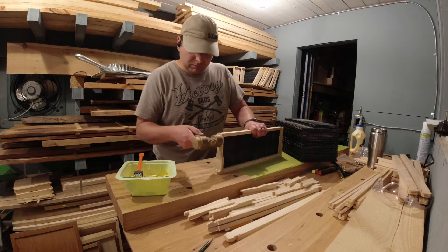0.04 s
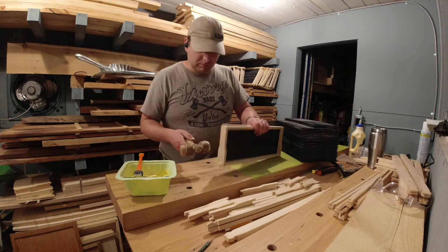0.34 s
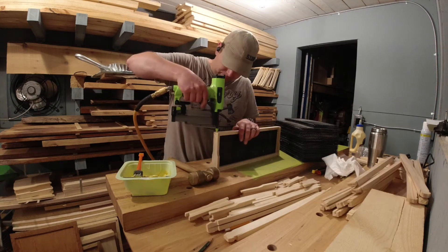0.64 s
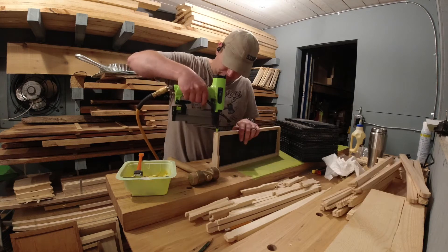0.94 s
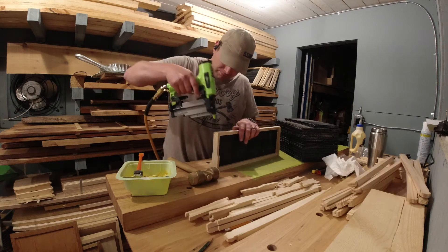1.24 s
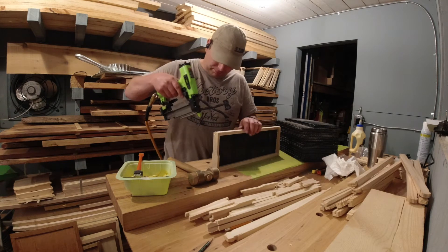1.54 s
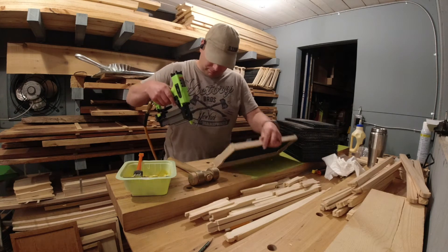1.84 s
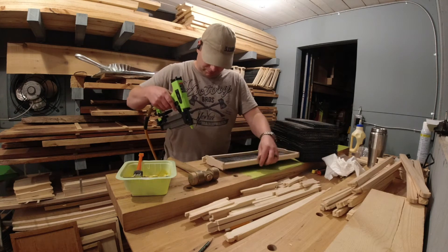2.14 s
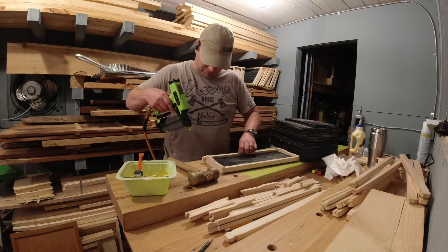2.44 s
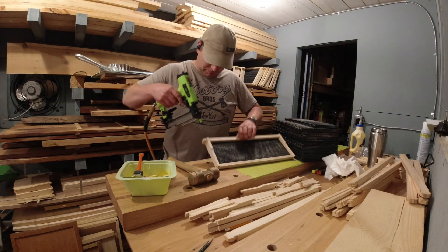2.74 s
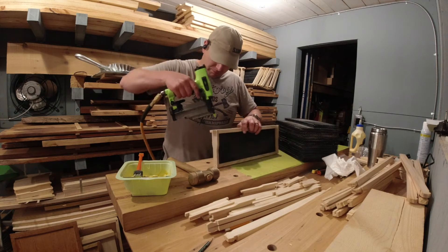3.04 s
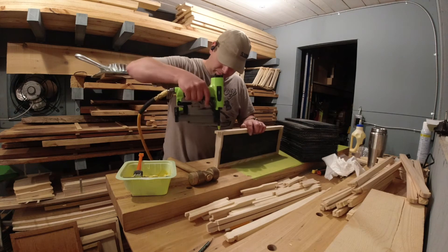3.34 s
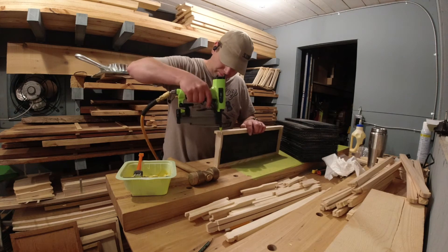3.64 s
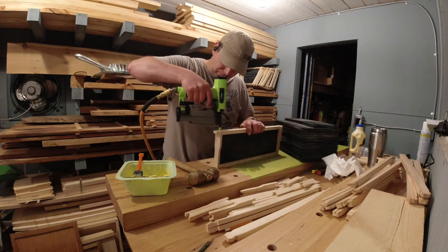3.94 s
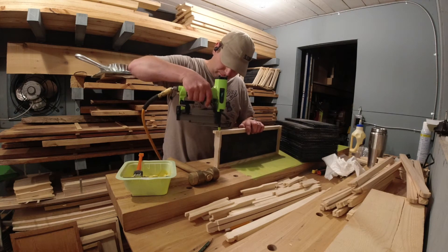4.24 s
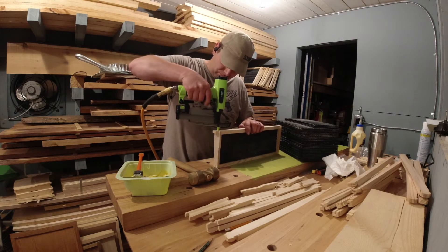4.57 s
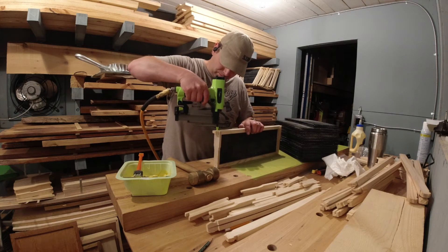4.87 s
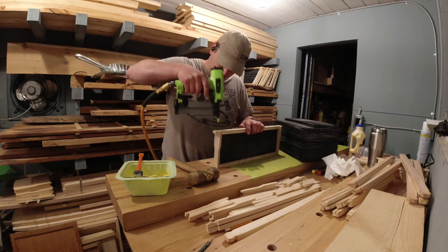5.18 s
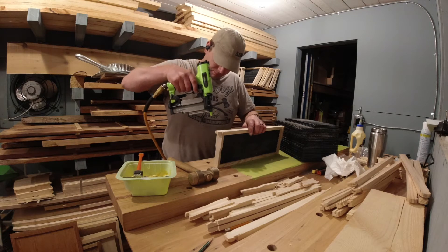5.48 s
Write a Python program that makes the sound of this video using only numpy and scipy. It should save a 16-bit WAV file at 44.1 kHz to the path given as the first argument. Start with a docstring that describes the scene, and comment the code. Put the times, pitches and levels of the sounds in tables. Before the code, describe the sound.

An air nailer fires three sharp shots in a small workshop, with a wooden frame clattering and knocking on the bench after the first.

```python
"""Nailing a wooden frame

On a workbench in a small timber-lined shop an air nailer fires three times: a puff at the valve, the
piston's blow, then exhaust and recoil. After the first nail the frame is slid over, dropped flat,
stood up again and pressed into place. Impacts excite the damped modes of nailer, frame and bench;
escaping air and sliding friction give broadband noise. The room carries it all to two microphones."""
import sys
import numpy as np
from scipy import signal
from scipy.fft import rfft, irfft, next_fast_len
from scipy.io import wavfile

SR = 44100
rng = np.random.default_rng(int(sys.argv[2]) if len(sys.argv) > 2 else 0)


def master_out(mix):
    """Clip the mix to full scale and print it as 16-bit PCM to the path in sys.argv[1]."""
    frames = np.transpose(np.atleast_2d(mix))
    ceiling = np.clip(frames, -1, 1)
    pcm = np.round(ceiling * 32767).astype(np.int16)
    wavfile.write(sys.argv[1], SR, pcm)


N = 251811
TIME = np.arange(N) / SR
TAIL = TIME[:26460]  # the first 0.6 s

# Levels are relative: each source applies its own gain. A cutoff is the brightness of a contact.
# nailer shots: (time [s], blow level [dB], valve lead [s], valve level [dB], exhaust lag [s],
# exhaust level [dB], piston return lag [s])
SHOTS = [(0.9536, 7, 0.037, -28, 0.019, -35.5, .11), (4.48, 7.5, 0.027, -32, 0.087, -33.5, 0.15),
         (4.9216, 6.5, .0235, -31.5, 0.067, -34, 0.12)]
# the nailer drops back on the joint: (time [s], first gap [s], landing level [dB], rebound level [dB])
RECOILS = [(1.011, 0.021, -4.5, -4), (4.579, 0.014, -5, -2), (4.998, .019, -1.5, -10.5)]
# hand and tool knock and scrape the frame: (time [s], level [dB], cutoff [Hz], scrape t60 [s])
KNOCKS = [(.002, -1.5, 626, 0.0056), (.003, -10, 4850, 0.082), (.25, -38, 890, 0.075),
          (.883, -32, 3683, .11), (1.985, -16, 505, .04), (2.543, -12, 550, .043), (2.594, -19, 980, 0.069),
          (2.636, -25, 2010, 0.042), (2.761, -27.5, 5900, .16), (2.839, -7, 500, .013),
          (2.956, -2, 1440, 0.046), (2.958, -8.5, 5100, 0.11), (3.204, -33, 700, .12),
          (3.472, -12, 320, .03), (3.495, -6, 260, .04), (3.685, -11, 240, 0.027), (5.67, -34, 905.5, 0.13)]
# the frame falls flat and bounces twice: (time [s], level [dB], cutoff [Hz], loss per corner [dB])
LANDINGS = [(2.2416, 3, 3330, 1), (2.312, 4.5, 1870, 3.1), (2.400, -10, 2420, 2.5)]
# the frame thumps the bench as it is stood up and pressed home: (time [s], level [dB], cutoff [Hz])
THUMPS = [(.003, -12, 203), (2.86, -10.5, 98), (2.955, -6, 631), (2.989, 3.5, 40), (3.04, -4, 41),
          (3.474, 0, 124.5), (3.517, 2.5, 75), (3.689, -16.5, 97), (3.82, -12.5, 49.65)]
# hands slide and turn the frame: (time [s], duration [s], level [dB], level change [dB])
SLIDES = [(.04, 0.04, -48.5, -18), (.36, 0.78, -73, -9), (1.47, 0.084, -71, -0.5), (1.6, 0.29, -69, -12),
          (1.83, 0.25, -53, -3), (2.05, 0.22, -63, 7.5), (2.5, 0.21, -53.5, -12), (2.66, 0.238, -70, 14),
          (3.06, 0.18, -62, 2), (3.33, .14, -68, -5.5), (3.48, .24, -66, -3.5), (3.72, 0.3, -77, -3.5),
          (4.22, 0.26, -84, 1.5), (5.48, .22, -88, 2)]
# weight is put on the bench: (time [s], duration [s], level [dB], level change [dB])
LEANS = [(0, 0.7, -70.5, 1), (1.05, 0.75, -55.5, -19), (2.0, 0.78, -70.5, 8), (2.8, 1.206, -54.5, -12.5),
         (5.0, 0.63, -59, -20)]

# normal modes of each body: (frequency [Hz], energy [dB], t60 [s])
NAILER_MODES = [(282, -18, 0.19), (370, -13.5, .06), (517, -8, .07), (609.9, -16.5, .06),
                (804, -19.5, 0.019), (883, -13, 0.049), (1042, -10.5, 0.093), (1200, -5, .08),
                (1390, -4.5, 0.058), (1686, -10.5, 0.068), (1600, -15, 0.26), (1885, -0.5, 0.057),
                (2120, -2, .06), (2235, -6.5, 0.057), (2410, -10.5, .06), (2930, -6, 0.17),
                (3210, -7.5, 0.18), (3445, -11, 0.21), (3930, -9, 0.031), (4030, -5.5, 0.02),
                (4020, -16.5, .07), (4590, -14, 0.045)]
TRIGGER_MODES = [(2400, -5.5, .003), (4240, -1, .009), (9500, -7, .002), (12700, -5, .002)]
FRAME_MODES = [(228, -12.5, .07), (303, -8.5, 0.064), (393, -10, 0.4), (499.4, -6, 0.17), (609, -4.5, 0.1),
               (712, -5.5, 0.077), (777, -4.5, 0.075), (896, -6, .05), (1082, -4, 0.17),
               (1217, -6.5, 0.066), (1314, -2, .05), (1510, -8, 0.12), (1882, -11, 0.014), (2260, -5, .025),
               (2680, -9.5, .02), (3120, -11, .015), (3330, -4.5, .015)]
BENCH_MODES = [(42, -5, .4), (60, -3, 0.67), (92, -6.5, 0.34), (128, -6.5, 0.047), (152, -6, .12),
               (206, 3, 0.052), (309, -0.5, 0.033)]
RUB_MODES = [(330, -5, .03), (435, -0.5, 0.1), (652.4, -5, 0.011), (794, -2, .03), (1044, -15, .04),
             (2110, -18, 0.053), (2870, -17, 0.018), (3710, -15, 0.027), (4720, -22.5, 0.026)]

# spectral envelope of each noise or transient: (frequency [Hz], level [dB])
CASING_CRACK = [(100, -9), (400, -2), (1000, -1), (1900, 3), (2600, -5.5), (3800, 3.5), (5200, -5.5),
                (6400, -9.5), (7500, -20), (8600, -6.5), (11000, -5), (15500, -5)]
AIR_JET = [(100, -13), (400, -8.5), (850, -11), (1400, -6.5), (2500, -7), (3800, -3), (5500, -12),
           (7200, -19), (8500, -7), (10000, -4), (13000, -0.5), (16000, -9)]
WOOD_TICK = [(150, -8.5), (700, -5), (2000, 1), (3700, 0), (5500, -8), (7200, -11.5), (9800, 1),
             (13000, -5.5), (16000, -13.5)]
WOOD_RUB = [(100, -25.5), (200, -8.5), (320, 5), (520, -5.5), (750, -13), (1000, -10.5), (1600, -11.5),
            (2500, -19.5), (3600, -17.5), (5000, -26), (7000, -45.5), (9700, -35.5), (15000, -60.5)]
BENCH_THUD = [(12, 0.5), (30, -3.5), (70, -1.5), (130, -4), (300, -9.5), (700, -18), (3000, -42.5)]
BENCH_RUMBLE = [(15, -8), (35, -0.5), (50, -4), (68, 2.5), (90, -9), (130, -19), (200, -25), (400, -43),
                (2000, -89.5)]
ROOM_TONE = [(59, -25.5), (100, -20.5), (193, -10), (721, -18.5), (930, -21.5), (1680, -17.5),
             (2040, -22.5), (4770, -24), (7610, -38), (16000, -43)]

# reverberation time of the shop: (frequency [Hz], t60 [s])
SHOP_T60 = [(100, .38), (300, .33), (1000, .32), (3000, .29), (8000, .255), (15000, .245)]


def nailer(stroke_s=.0035, ring_db=1, crack_db=3.98, contact_db=-7.5, first_crack_db=-4.5):
    """Double impact: the driver meets the nail, then the piston slams home and the casing rattles."""
    blows, cracks, tone = np.zeros(N), np.zeros((2, N)), colour(CASING_CRACK)
    for s, blow_db, *_ in SHOTS:
        ring = from_db(blow_db + ring_db) * ringing(NAILER_MODES, length_s=.2, detune=.0075)
        add(blows, s, from_db(contact_db) * ring)
        add(blows, s + stroke_s, ring)
        crack_gain = from_db(blow_db + crack_db)
        add(cracks, s, crack_gain * from_db(contact_db + first_crack_db) * chatter(tone, t60=.019))
        add(cracks, s + stroke_s, crack_gain * chatter(tone, t60=.069))
    return (through(blows, shop(near_db=-3, near_t60=.017, tail_db=-8, lead_s=.00006))
            + through(cracks, shop(near_db=-9.5, near_t60=.12, tail_db=-7)))


def air_jets(jet_db=3, opening_s=.014, valve_hold_s=.012, shut_early_s=.012):
    """Turbulent jet noise: valve and exhaust each open quickly, hold, and die as the pressure falls."""
    flow, opening = np.zeros(N), 1 - fade(TAIL, opening_s)
    for s, _, valve_lead, valve_db, exhaust_lag, exhaust_db, return_lag in SHOTS:
        add(flow, s - valve_lead, from_db(valve_db) * opening * fade(TAIL - valve_hold_s, t60=.076))
        hold_s = return_lag - exhaust_lag - shut_early_s  # until just before the piston is back
        add(flow, s + exhaust_lag, from_db(exhaust_db) * opening * fade(TAIL - hold_s, t60=.09))
    jet = through(from_db(jet_db) * flow * hiss(), colour(AIR_JET))
    return through(jet, shop(near_db=2, near_t60=.099, tail_db=-8))


def recoil_bounces(gap_ratio=.89, loss_db=9):
    """Inelastic rebound: the nailer lands, bounces, then touches again, sooner and softer."""
    for s, gap, landing_db, rebound_db in RECOILS:
        yield s, landing_db
        yield s + gap, rebound_db
        yield s + gap * (1 + gap_ratio), rebound_db - loss_db


def frame(ring_db=-1, damping_s=.2):
    """Impact excitation: each contact rings the frame under a woody scrape; long scrapes damp it."""
    dry, tone = np.zeros((2, N)), colour(WOOD_TICK)
    for s, db, hz, scrape_t60 in frame_contacts():
        ring = ringing(FRAME_MODES, length_s=.12, uneven_db=4.5, detune=.025)
        ring /= 1 + (scrape_t60 / damping_s) ** 2
        add(dry, s, from_db(db + ring_db) * soften(ring, hz))
        add(dry, s, from_db(db) * soften(chatter(tone, scrape_t60), hz))
    return through(dry, shop(near_db=-6, near_t60=.18, tail_db=-9, lead_s=-.000025))


def frame_contacts(recoil_db=-5.5, recoil_hz=734, return_db=-12.5, return_hz=5500, scrape_t60=.016):
    """Impulsive forces on the frame: (time [s], level [dB], cutoff [Hz], scrape t60 [s])."""
    recoils = [(s, db + recoil_db, recoil_hz, scrape_t60) for s, db in recoil_bounces()]
    piston_returns = [(s + lag, return_db, return_hz, scrape_t60) for s, *_, lag in SHOTS]
    return list(KNOCKS) + list(corner_clatter()) + recoils + piston_returns


def corner_clatter(first_gap_s=.0065, gap_growth=1.4, scrape_t60=.038):
    """Successive impacts: the four corners of the falling frame land in turn, at widening gaps."""
    for s, db, hz, loss_db in LANDINGS:
        for corner in range(4):
            yield s, db - corner * loss_db, hz, scrape_t60
            s += first_gap_s * gap_growth ** corner


def bench(strike_db=-2):
    """Low-frequency resonance: the heavy top answers each contact with a thud and a modal boom."""
    dry, boom, thud = np.zeros(N), ringing(BENCH_MODES, length_s=.94), colour(BENCH_THUD)
    for s, db, hz in bench_contacts():
        add(dry, s, from_db(db + strike_db) * soften(boom, hz))
        add(dry, s, from_db(db + strike_db) * soften(thud, hz))
    return through(dry, shop(near_db=-9.5, near_t60=.06, tail_db=-11, lead_s=.00008))


def bench_contacts(recoil_hz=330, drop_db=-25, drop_hz=450, valve_db=-22, jolt_db=-21, jolt_hz=395):
    """Structure-borne impulses that reach the bench top: (time [s], level [dB], cutoff [Hz])."""
    contacts = list(THUMPS) + [(s, db, recoil_hz) for s, db in recoil_bounces()]
    contacts += [(s, db + drop_db, drop_hz) for s, db, *_ in LANDINGS]
    for s, blow_db, valve_lead, *_ in SHOTS:
        contacts += [(s - valve_lead, valve_db, jolt_hz), (s, blow_db + jolt_db, jolt_hz)]
    return contacts


def sliding(rub_db=-1, slips_per_s=32, slip_db=3, catches_per_s=22, catch_db=22, catch_spread_db=2.5):
    """Stick-slip friction: wood rubs unevenly and ticks where an edge catches on the grain."""
    effort = swells(SLIDES)
    slips = np.interp(TIME * slips_per_s, np.arange(N), rng.standard_normal(N))
    friction = hiss() * effort * from_db(rub_db + slip_db * slips)
    wood = colour(WOOD_RUB)
    add(wood, 0, ringing(RUB_MODES, length_s=.1))
    caught = rng.random(N) < catches_per_s / SR
    catches = caught * effort * from_db(catch_db + catch_spread_db * rng.standard_normal(N))
    tick = soften(chatter(colour(WOOD_TICK), t60=.077), hz=3000)
    dry = through(friction, wood) + through(catches, tick)
    return through(dry, shop(near_db=-5, near_t60=.017, tail_db=-10))


def trigger(ahead_s=.023, click_db=-34):
    """Contact noise: the trigger's small steel parts click and grate just before the valve opens."""
    dry, steel = np.zeros((2, N)), ringing(TRIGGER_MODES, length_s=.15)
    for s, _, valve_lead, *_ in SHOTS:
        add(dry, s - valve_lead - ahead_s, from_db(click_db) * chatter(steel, t60=.14))
    return through(dry, shop(near_db=-1.5, near_t60=.05, tail_db=-8.5))


def bench_rumble(still_db=-72.5):
    """Amplitude-modulated noise: a faint rumble swells as weight shifts on the bench."""
    return ambient(BENCH_RUMBLE) * (swells(LEANS) + from_db(still_db))


def shop(near_db, near_t60, tail_db, lead_s=0):
    """Room impulse response: direct sound (left leads by lead_s), near scatter and reverberation."""
    size = len(TAIL)
    hz = np.fft.rfftfreq(size, 1 / SR)
    direct = np.array([np.sinc((TAIL - lag) * SR - 8) for lag in (0, lead_s)])
    near = unit(diffuse(size) * fade(TAIL, near_t60) * (1 - fade(TAIL, .002)))
    field, centres = rfft(diffuse(size)), np.array(SHOP_T60)[:, 0]
    tail = np.zeros((2, size))
    for share, (_, t60) in zip(np.eye(len(centres)), SHOP_T60):
        band = irfft(field * at_hz(np.c_[centres, share], hz), size)
        tail += band * fade(TAIL, t60)
    tail *= 1 - fade(TAIL, .04)
    return unit(direct + from_db(near_db) * near) + from_db(tail_db) * unit(tail)


def ambient(spectrum):
    """Stationary noise: a diffuse field filtered to a given spectrum."""
    return through(hiss(), colour(spectrum))


def ringing(modes, length_s, uneven_db=0, detune=0):
    """Modal superposition: the striking spot varies each mode's strength, the grip its pitch."""
    hz, db, t60 = np.transpose(modes)[:, :, None]
    strength, pitch = rng.standard_normal((2, len(modes), 1))
    t, signs = TIME[:int(length_s * SR)], (-1) ** np.arange(len(modes))[:, None]
    amplitudes = signs * from_db(db + uneven_db * strength) / np.sqrt(t60)
    partials = np.sin(2 * np.pi * hz * (1 + detune * pitch) * t)
    return unit(np.sum(amplitudes * partials * fade(t, t60), axis=0))


def chatter(tone, t60):
    """Scattering: tiny contacts, spread by the timber, merge into a burst that swells and dies."""
    t = TIME[:len(tone)]
    burst = diffuse(len(t)) * fade(t, t60) * (1 - fade(t, t60 / 2))
    return unit(through(burst, tone)[:, :len(t)])


def soften(sound, hz):
    """Contact compliance as a low-pass: a softer contact pushes for longer and sounds duller."""
    return signal.sosfilt(signal.butter(2, min(hz, SR / 3), fs=SR, output="sos"), sound)


def swells(movements, attack_share=.09, release_t60=.056):
    """Amplitude envelope: each movement builds up, drifts in strength, and dies away."""
    level = np.zeros(N)
    for s, length, db, change_db in movements:
        progress = np.clip((TIME - s) / length, 0, 1)
        attack = np.minimum(progress / attack_share, 1)
        level += from_db(db + change_db * progress) * attack * fade(TIME - s - length, release_t60)
    return level


def diffuse(size, spacing_m=.048, sound_m_per_s=343):
    """Diffuse-field coherence: noise at two close microphones is alike in the bass, not the treble."""
    hz = np.fft.rfftfreq(size, 1 / SR)
    coherence = .994 * np.sinc(2 * hz * spacing_m / sound_m_per_s)
    mid, side = np.exp(2j * np.pi * rng.random((2, len(hz)))) * np.sqrt(size / 2)
    return irfft(np.sqrt(1 + coherence) * mid + np.sqrt(1 - coherence) * side * [[1], [-1]], size)


def hiss():
    """Diffuse white noise as long as the scene."""
    return diffuse(2 * next_fast_len(N // 2 + 1, True))[:, :N]


def colour(spectrum, size=8192):
    """Minimum-phase impulse response of a spectrum, with unit energy."""
    magnitude = from_db(at_hz(spectrum, np.fft.rfftfreq(size, 1 / SR)))
    cepstrum = irfft(np.log(magnitude))
    cepstrum[size // 2:] = 0
    return unit(irfft(np.exp(2 * rfft(cepstrum))))


def through(x, response):
    """Convolution with an impulse response."""
    return signal.fftconvolve(np.atleast_2d(x), np.atleast_2d(response), axes=-1)[:, :N]


def add(track, s, sound):
    """Superposition of a sound on a track, starting at s seconds."""
    size = track.shape[-1]
    start = int(np.clip(round(s * SR), 0, size - 1))
    track[..., start:start + sound.shape[-1]] += sound[..., :size - start]


def at_hz(points, hz):
    """Interpolation on a log-frequency axis."""
    knots, values = np.transpose(points)
    return np.interp(np.log(hz + 1), np.log(knots), values)


def fade(t, t60):
    """Exponential decay: one until t = 0, then falling 60 dB every t60."""
    return np.exp(-np.log(1000) * np.clip(t / t60, 0, 10))


def unit(x):
    """Normalisation to a mean energy of one per channel."""
    return x / np.sqrt(np.mean(np.sum(x ** 2, axis=-1)))


def from_db(db):
    """Amplitude ratio of a level in decibels."""
    return 10 ** (np.asarray(db) / 20)


def scene(room_tone_db=-86):
    """Linear superposition: the work at the bench adds to the quiet of the shop."""
    work = nailer() + air_jets() + frame() + bench() + sliding() + bench_rumble() + trigger()
    return work + from_db(room_tone_db) * ambient(ROOM_TONE)


def record(dry, cutoff_hz=16100):
    """Band limiting: a steep elliptic low-pass removes the highest treble."""
    return signal.sosfilt(signal.ellip(10, .1, 80, cutoff_hz, fs=SR, output="sos"), dry)


dry = scene()
out = record(dry)
master_out(out)
```